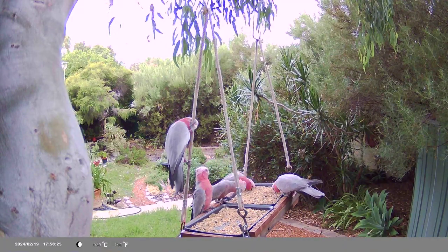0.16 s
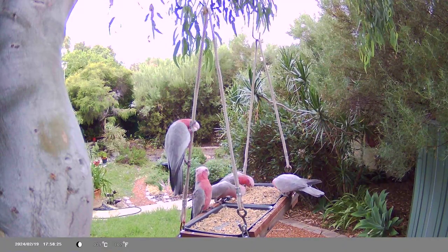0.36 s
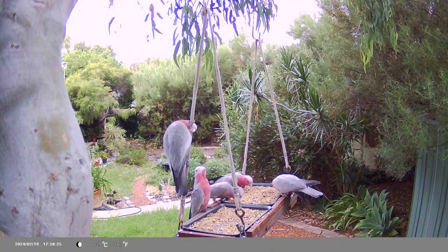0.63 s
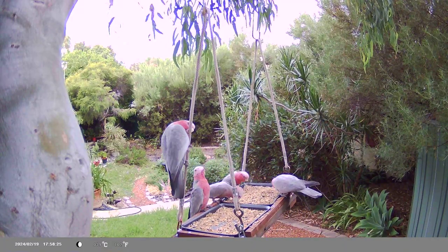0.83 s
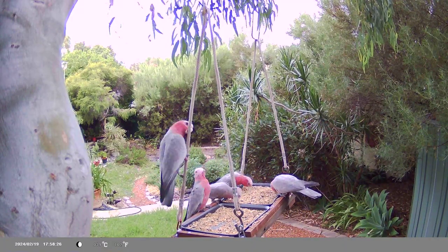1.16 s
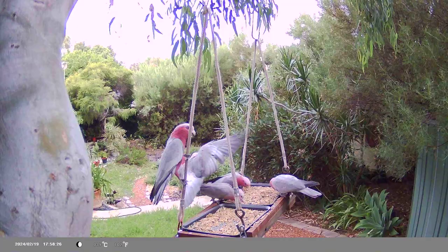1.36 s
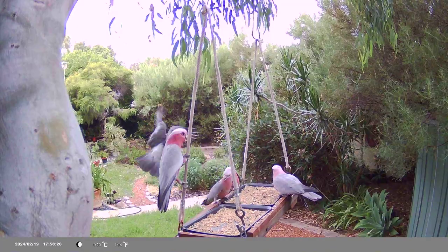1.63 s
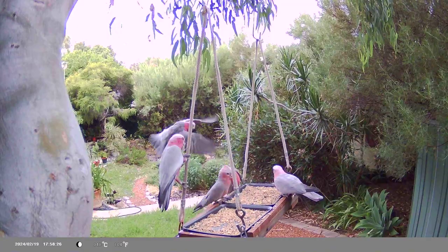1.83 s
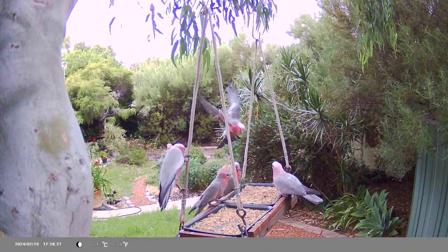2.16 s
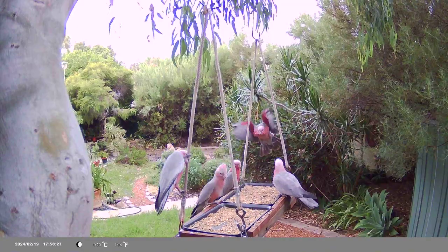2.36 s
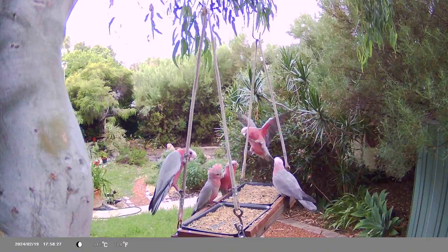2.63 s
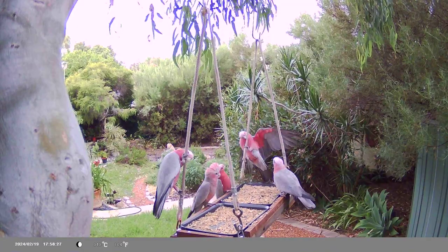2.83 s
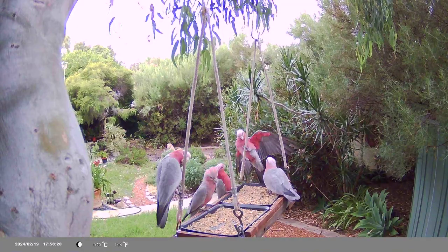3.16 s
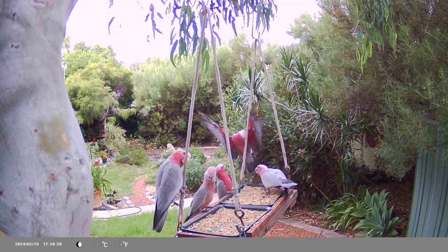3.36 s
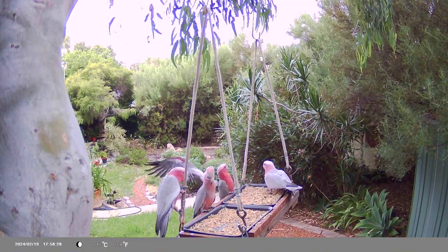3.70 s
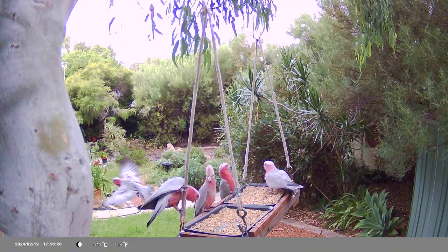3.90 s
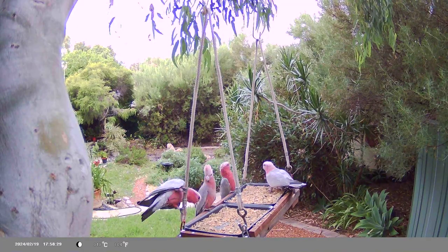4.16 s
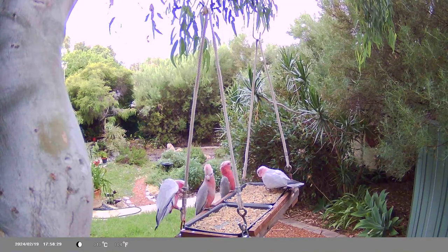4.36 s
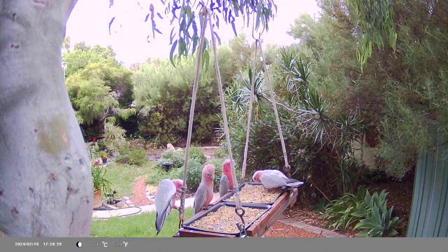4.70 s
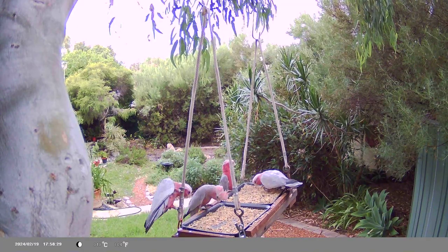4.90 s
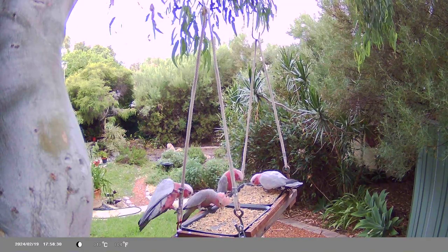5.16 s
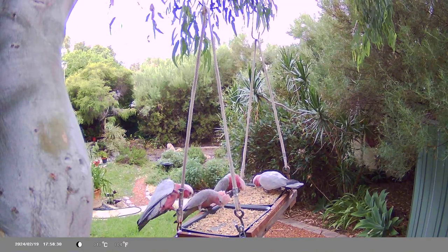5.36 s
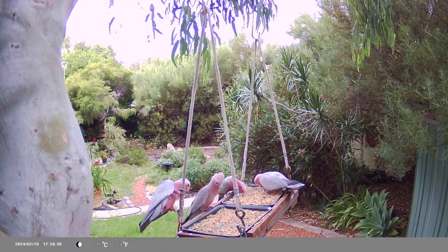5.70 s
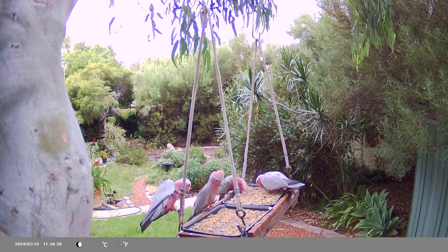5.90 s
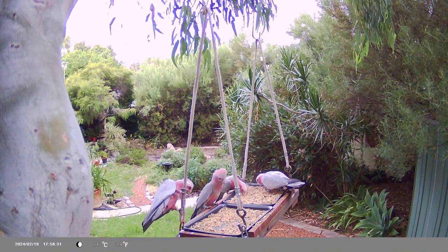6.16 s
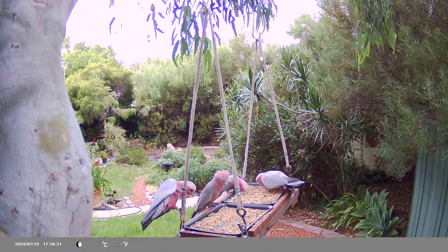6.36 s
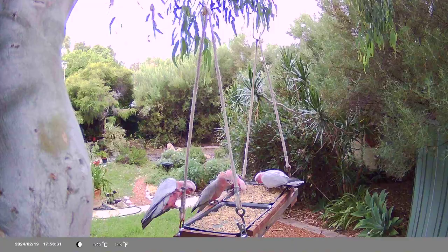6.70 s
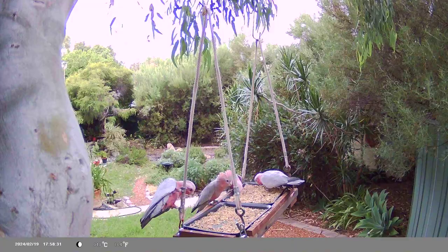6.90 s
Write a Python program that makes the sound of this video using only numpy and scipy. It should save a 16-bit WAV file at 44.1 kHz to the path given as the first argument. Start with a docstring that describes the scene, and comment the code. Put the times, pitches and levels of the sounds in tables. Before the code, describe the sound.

Pink-and-grey parrots squabble at a hanging wooden seed tray: two harsh screeches, fluttering wings, claw knocks, cracking husks and thin chirps over faint rumble.

```python
"""Galahs squabble on a hanging wooden seed tray in a garden: their voices are pulse trains shaped by a throat.
They beat their wings (swelling noise), knock the tray and crack seeds (short bursts through resonances).
Fences and shrubs return a faint echo, made of scattered, dying reflections.
A low distant rumble of filtered noise and a faint wavering hum lie underneath."""
import sys
import numpy as np
from scipy import signal
from scipy.fft import rfft, irfft, next_fast_len
from scipy.io import wavfile
from scipy.ndimage import uniform_filter1d

SR = 44100
rng = np.random.default_rng(int(sys.argv[2]) if len(sys.argv) > 2 else 0)


def dump(signal):
    """Clip the signal to [-1, 1] and save it as 16-bit WAV at the path in sys.argv[1]."""
    limited = np.clip(np.atleast_2d(signal).T, -1, 1)
    pcm = np.round(limited * 32767).astype(np.int16)
    wavfile.write(sys.argv[1], SR, pcm)


N = 310014   # length of the scene [samples]

# All levels of calls, knocks, snaps and cracks are relative: each kind gets its own gain in the mix.

# Distant rumble, tone colour: (frequency [Hz], relative level [dB])
RUMBLE_COLOUR = [(50, -16), (80, -13), (100, 1), (115, -2), (138, 2), (175, -3), (200, -4.5), (240, -13),
                 (400, -27), (1000, -58)]
RUMBLE_DB, HUM_DB = -47.5, -54.5   # rms levels
HUM_HZ = 99.5   # average pitch; it wavers

# Flurries of scuffling: (start [s], end [s], feather rustle [dB], low buffeting [dB])
FLURRIES = [(.04, .18, -62, -47), (1.5, 2.68, -59.8, -42.5), (3.42, 4.38, -59.3, -46.5),
            (4.62, 4.95, -63.5, -46.5)]
# Runs of wingbeats, a take-off, a landing and a departure:
# (first beat [s], last beat [s], low whoosh [dB], feather swish [dB], change of the swish [dB per s])
FLIGHTS = [(1.862, 2.745, -47, -55.5, 5), (3.215, 3.435, -54, -57, 17), (3.797, 4.497, -43, -50.5, -14)]
# Tone colour of rustling feathers: (frequency [Hz], relative level [dB per Hz])
FEATHER_COLOUR = [(600, -5.5), (1200, 2.5), (2200, 4), (3500, 0.5), (5000, -3.5), (7300, -8), (8500, -30),
                  (10000, -39.5)]
# Tone colour of air stirred by the wings: (frequency [Hz], relative level [dB per Hz])
AIR_COLOUR = [(150, -3), (280, 2.5), (420, -0.5), (580, 0), (750, -5), (1000, -7), (1600, -15), (3000, -30)]
# Tone colour of the whoosh of one wingbeat: (frequency [Hz], relative level [dB per Hz])
WHOOSH_COLOUR = [(110, -16), (220, 6), (330, 4), (480, -6.5), (800, -8.5), (1500, -26)]
# Tone colour of the very low buffeting: (frequency [Hz], relative level [dB per Hz])
BUFFET_COLOUR = [(12, -7), (25, 5), (38, 0), (49, 14), (62, -6), (85, -2), (160, -42)]
FLURRY_RISE_S, FLURRY_FALL_S = .21, .2
CALM_RUSTLE_DB, CALM_AIR_DB, CALM_BUFFET_DB = -68.3, -51.1, -49   # between flurries
AIR_FOLLOWS = .17   # share of the rustle's rise in dB that the air takes on
WINGBEATS_PER_S = 9   # roughly: each flight holds a whole number of beats
BEAT_SPREAD_DB = 1.1

# A long and a short harsh screech: (time [s], pitch [Hz], level [dB], roughness [0-1])
SCREECHES = [
    [(.034, 1180, -50, .02), (.041, 1180, -26.5, .05), (.053, 1240, -20.5, .8), (.106, 1160, -23, .85),
     (.118, 1385, -27, .55), (.148, 1248, -28, .12), (.188, 1200, -35, .18), (.208, 1365, -39, .18)],
    [(1.559, 1400, -50, .25), (1.570, 1530, -31, .08), (1.586, 1330, -17.5, .95), (1.596, 1295, -20, .75),
     (1.604, 1430, -22.5, .35), (1.617, 1470, -23.5, .1), (1.636, 1440, -32, .6), (1.642, 1430, -55, .3)],
]
# Throat and beak response for each screech: (frequency [Hz], level [dB])
SCREECH_THROATS = [
    [(250, -35), (480, -4), (850, -13), (1230, -5), (1550, -12.5), (2050, 0.5), (2500, 2.5), (2880, 1.5),
     (3100, -10), (3450, 1.5), (4100, -2), (4900, -16.5), (5600, -14), (7600, -22.5)],
    [(250, -44), (500, -6.5), (800, -17), (1350, -6.5), (1800, -8.5), (2450, 2), (2850, 2), (3200, -13),
     (4200, -8), (5200, -18), (6200, -25), (7400, -23)],
]
# Each single note below is (start [s], length [s], start pitch [Hz], middle pitch [Hz], end pitch [Hz],
# level [dB], swell over the note [dB], roughness [0-1]).
# A rasp that closes the long screech: columns as above
RASP = (.205, .056, 1000, 1070, 1070, -32.5, 7, .45)
# A second bird's short whine under the end of the long screech: columns as above
WHINE = (.202, .070, 1760, 1760, 1520, -40, -6, .35)
# Clear whistled chirps: columns as above
CHIRPS = [(.402, .046, 1990, 2020, 2260, -52, 15, .1), (.451, .022, 1850, 1740, 1580, -50, -8, .22),
          (4.716, .044, 2700, 2400, 1930, -38, -11, .2), (4.760, .046, 2200, 2040, 1800, -43, 4, .17),
          (5.052, .019, 2040, 2070, 2420, -37, 8, .08), (5.072, .015, 3600, 3990, 3650, -43, 0, .08),
          (5.087, .064, 2330, 1905, 1680, -28.6, -14, .085), (5.134, .012, 1850, 2400, 2850, -32, 0, .11),
          (5.150, .072, 2450, 2280, 1400, -33, -11, .1)]
# Thin squeals from further off: columns as above
SQUEALS = [(4.237, .022, 4120, 3740, 3650, -28, 12, .07), (4.611, .150, 2530, 2770, 2770, -36.8, -1, .34)]
# A low grunt that ends the first squeal: columns as above
GRUNT = (4.251, .037, 660, 655, 650, -39, -14, .22)
# Throat and beak response for chirps and the whine: (frequency [Hz], level [dB])
CHIRP_THROAT = [(1400, -7.5), (2200, -0.5), (3200, -8), (4100, 0), (5000, -16), (6200, -23), (7500, -16.5),
                (8500, -22)]
# Throat and beak response for squeals: (frequency [Hz], level [dB])
SQUEAL_THROAT = [(900, -23), (1900, -5), (2700, 0), (3700, 4.5), (4500, -6), (5500, 1), (6300, -22),
                 (7400, -7.5), (7900, -12), (8400, -13)]
# Throat and beak response for the grunt: (frequency [Hz], level [dB])
GRUNT_THROAT = [(300, -8), (650, -8), (1300, -3.5), (1950, -14), (2600, -11), (4200, -13), (6000, -20.5),
                (8000, -8.5)]
NOTE_RAMP_DB = 22   # depth of a note's attack and release
SWOOP_S = .0025   # how fast a falling chirp drops onto its pitch
ROUGH_DOUBLES, ROUGH_BLURS = .5, .5   # period doubling gained and tripling lost at full roughness

# Claws and beaks knock the tray: (time [s], peak level [dB], claw tick over wooden body [dB])
KNOCKS = [(0.557, -35.5, -2), (0.62, -41, -11), (1.042, -36.5, -12), (1.403, -33.5, 2), (1.522, -33, 2),
          (1.762, -36.5, -3), (2.696, -28.5, 6), (2.73, -35, 4), (2.823, -39, -10), (3.482, -28.5, -4),
          (3.585, -28.5, -1), (3.663, -32.5, 0), (4.471, -21, 6), (5.375, -42.5, -2)]
# Response of the wooden tray: (frequency [Hz], level [dB])
TRAY_BODY = [(200, -29.5), (600, -9.5), (1000, 5), (1700, 0.5), (2600, -10), (3500, -39), (6000, -41)]
# Response of a hard claw or beak, also used for splitting husks: (frequency [Hz], level [dB])
CLAW_TICK = [(1500, -34), (2700, 1), (3800, -0.5), (4800, 0.5), (6400, 0), (8000, -1.5)]
KNOCK_T60_S = .037   # time to die away by 60 dB

# The loudest seed husks crack: (time [s], peak level [dB], ring [Hz])
CRACKS = [(0.852, -42, 6740), (0.9113, -41, 3550), (1.4531, -31, 4520), (1.9016, -32, 6190),
          (2.372, -39, 5280), (2.5561, -40, 6160), (2.7776, -44, 4680), (2.9682, -43, 5500),
          (3.0031, -35, 4480), (3.0205, -40, 4930), (3.0929, -36, 4470), (3.1353, -45, 4350),
          (3.2286, -41, 5330), (3.2829, -42, 5400), (3.3174, -43, 5860), (3.3817, -45, 5630),
          (5.8581, -43, 3800), (5.9229, -48, 4320), (5.9913, -33, 5420), (6.4817, -42, 4710),
          (6.78, -41, 4220)]
# Bouts of quieter nibbling: (start [s], end [s], rate [cracks per s])
NIBBLING = [(.7, 1.3, 3), (5.8, 6.1, 10), (6.3, 6.7, 5)]
NIBBLE_DB, NIBBLE_SPREAD_DB = -46, 1.2
NIBBLE_LOW_HZ, NIBBLE_HIGH_HZ = 3200, 6500   # range of their rings

# Beaks snap shut: (time [s], peak level [dB])
SNAPS = [(0.832, -24.5), (6.243, -20)]
# Response of the snapping beak: (frequency [Hz], level [dB])
BEAK = [(300, -18), (900, 2), (1600, 1.5), (2400, -9.5), (3700, -8.5), (4900, -19), (6700, -8),
        (8300, -17.5)]

# Response of the microphone: (frequency [Hz], level [dB])
MICROPHONE = [(12, -8), (35, 0), (7400, 0), (8000, -6), (8500, -13), (9000, -24)]
CUTOFF_HZ = 8900   # top of the sound


def from_db(db):
    """Turn decibels into gain."""
    return 10 ** (np.asarray(db) / 20)


def rms_one(x):
    """Scale to an rms of 1."""
    return x / np.sqrt(np.mean(x ** 2) + 1e-20)


def curves(rows, t):
    """Read each column of a table at the times t."""
    s, *columns = np.transpose(rows)
    return [np.interp(t, s, column) for column in columns]


def add(out, start, sound):
    """Mix a sound in at its start time."""
    i = round(start * SR)
    out[i:i + len(sound)] += sound[:N - i]


def colour(x, spectrum):
    """Filter to the given (Hz, dB) response; minimum phase, so nothing sounds ahead of its cause."""
    size = 2 * next_fast_len(len(x) // 2 + 1024)
    hz, db = np.transpose(spectrum)
    grid_hz = np.fft.rfftfreq(size, 1 / SR)
    gain = from_db(np.interp(np.log(grid_hz + 1), np.log(hz), db))
    # folding the cepstrum forward in time gives the minimum phase
    cepstrum = irfft(np.log(gain))
    cepstrum[1:size // 2] *= 2
    cepstrum[size // 2 + 1:] = 0
    return irfft(rfft(x, size) * np.exp(rfft(cepstrum)))[:len(x)]


def drift(rate_hz, size):
    """Random wandering, mostly slower than the given rate, with a spread of 1."""
    hz = np.fft.rfftfreq(size, 1 / SR)
    slowed = rfft(rng.standard_normal(size)) / (1 + (hz / rate_hz) ** 2)
    return rms_one(irfft(slowed, size))


def noise(spectrum):
    """Coloured noise with an rms of 1."""
    return rms_one(colour(rng.standard_normal(N), spectrum))


def rumble_and_hum():
    """Steady low noise with a faint sine whose pitch wavers."""
    hum_hz = HUM_HZ * (1 + 0.02517 * drift(3.81, N))
    hum = np.sqrt(2) * np.sin(2 * np.pi * np.cumsum(hum_hz) / SR)
    return from_db(RUMBLE_DB) * noise(RUMBLE_COLOUR) + from_db(HUM_DB) * hum


def commotion():
    """Rustle and buffeting above their calm levels [dB]: each flurry rises, holds and dies down."""
    t = np.arange(N) / SR
    rises = []
    for start, end, rustle_db, buffet_db in FLURRIES:
        shape = np.interp(t, [start - FLURRY_RISE_S, start, end, end + FLURRY_FALL_S], [0, 1, 1, 0])
        rises.append(np.outer([rustle_db - CALM_RUSTLE_DB, buffet_db - CALM_BUFFET_DB], shape))
    return np.max(rises, axis=0)


def wingbeats():
    """Even beats through each flight, each with its own strength: (time [s], whoosh [dB], swish [dB])."""
    rows = []
    for first, last, whoosh_db, swish_db, db_per_s in FLIGHTS:
        count = round((last - first) * WINGBEATS_PER_S) + 1
        for s in np.linspace(first, last, count):
            effort_db = BEAT_SPREAD_DB * rng.standard_normal()
            rows.append((s, whoosh_db + effort_db, swish_db + db_per_s * (s - first) + effort_db))
    return rows


def wings(rise_s, fall_s, grain_db, flicks_per_s):
    """Feathers rustle and stir the air, more so in flurries; each wingbeat adds a whoosh and a swish."""
    busy_db, gust_db = commotion()
    whoosh, swish = np.zeros(N), np.zeros(N)
    t = np.arange(-SR // 8, SR // 8) / SR
    swell = np.exp(-(t / np.where(t < 0, rise_s, fall_s)) ** 2)
    for s, whoosh_db, swish_db in wingbeats():
        add(whoosh, s + t[0], from_db(whoosh_db) * swell)
        add(swish, s + t[0], from_db(swish_db) * swell)
    # quills flick past each other at random moments
    touches = rng.standard_normal(N) * (rng.random(N) < flicks_per_s / SR)
    flicks = rms_one(colour(touches, FEATHER_COLOUR))
    rustle_db = CALM_RUSTLE_DB + busy_db + grain_db * drift(200, N)
    feathers = from_db(rustle_db) * noise(FEATHER_COLOUR) + swish * flicks
    air = from_db(CALM_AIR_DB + AIR_FOLLOWS * busy_db) * noise(AIR_COLOUR) + whoosh * noise(WHOOSH_COLOUR)
    buffeting = from_db(CALM_BUFFET_DB + gust_db) * noise(BUFFET_COLOUR)
    return feathers + air + buffeting


def call(rows, throat, jitter, shimmer, hiss, chaos_hz, swing_db, flicker_db):
    """The syrinx pulses into the throat; pressed hard, it repeats every 2nd or 3rd cycle and turns chaotic."""
    t = np.arange(rows[0][0], rows[-1][0], 1 / SR)
    pitch, level_db, *shares = curves(rows, t)
    rough, doubling, tripling = np.clip(shares, 0, 1)
    shaky_pitch = pitch * (1 + jitter * rough * drift(chaos_hz, len(t)))
    phase = 2 * np.pi * np.cumsum(shaky_pitch) / SR
    pulses = np.zeros(len(t))
    # k counts sixths of the pitch: 6 is the fundamental, 3 its half, 2 and 4 its thirds
    for k in range(1, int(6 * CUTOFF_HZ / pitch.min())):
        weight = tripling * (k % 6 in (2, 4)) + doubling * (k % 6 == 3) + (k % 6 == 0)
        # a freely swinging membrane favours its fundamental
        weight = weight + (k == 6) * from_db(swing_db) * (1 - tripling)
        # tongue and beak keep shifting the partials
        weight = weight * from_db(flicker_db * np.sqrt(rough) * drift(35, len(t)))
        lag = .07 * k ** 2   # high partials leave later, which smears each pulse
        audible = k / 6 * pitch < SR / 3
        pulses += weight * np.cos(k / 6 * phase - lag) * audible
    pulses *= 1 + shimmer * rough * drift(chaos_hz, len(t))
    # air escapes once a cycle
    air = hiss * rough * rng.standard_normal(len(t)) * (1 + np.cos(phase))
    voice = colour(pulses + air, throat)
    # even out the loudness, so that the level column alone shapes it
    voice /= np.sqrt(np.abs(uniform_filter1d(voice ** 2, size=300)) + 1e-12)
    out = np.zeros(N)
    add(out, t[0], voice * from_db(level_db))
    return out


def screech(rows, break_s):
    """A rough voice doubles its period; after its break it also repeats every third cycle."""
    t = np.arange(rows[0][0], rows[-1][0], .001)
    pitch, level_db, rough = curves(rows, t)
    doubling = ROUGH_DOUBLES * rough
    tripling = (t > break_s) * (1 - ROUGH_BLURS * rough)
    return np.transpose([t, pitch, level_db, rough, doubling, tripling])


def note(row, attack_s, release_s, swoop=0, doubling=0, tripling=0, break_share=1):
    """One arc of pitch that swells or fades; it may swoop in from above, double its period, then triple it."""
    s, length, start_hz, middle_hz, end_hz, level_db, swell_db, rough = row
    u = np.linspace(0, 1, 100)   # share of the note that has passed
    pitch = np.polyval(np.polyfit([0, .5, 1], [start_hz, middle_hz, end_hz], 2), u)
    falling = end_hz < start_hz   # only falling notes swoop
    pitch = pitch * (1 + swoop * falling * np.exp(-u * length / SWOOP_S))
    opening = np.minimum(1, np.minimum(u * length / attack_s, (1 - u) * length / release_s))
    level = level_db + swell_db * (u - .5) + NOTE_RAMP_DB * (opening - 1)
    broken = u > break_share
    return np.transpose([s + u * length, pitch, level, np.full_like(u, rough),
                         doubling * rough * ~broken, tripling * rough * broken])


def screeches():
    """Harsh calls: rough, breathy pulses whose period doubles and triples; a rasp closes the long one."""
    long_screech = call(screech(SCREECHES[0], break_s=.112), SCREECH_THROATS[0], jitter=0.0915,
                        shimmer=0.56, hiss=3.8, chaos_hz=400, swing_db=9.5, flicker_db=4.0)
    rasp = call(note(RASP, attack_s=.005, release_s=.007, doubling=.5), SCREECH_THROATS[0], jitter=0.09,
                shimmer=0.56, hiss=3.8, chaos_hz=400, swing_db=11, flicker_db=4.0)
    short_screech = call(screech(SCREECHES[1], break_s=1.55), SCREECH_THROATS[1], jitter=0.093,
                         shimmer=0.34, hiss=3.3, chaos_hz=296, swing_db=8, flicker_db=3.5)
    return from_db(-4) * (long_screech + rasp) + from_db(-4.5) * short_screech


def whine():
    """A second bird's voice, with a very strong fundamental."""
    return call(note(WHINE, attack_s=.003, release_s=.012), CHIRP_THROAT, jitter=.1,
                shimmer=0.98, hiss=1.2, chaos_hz=200, swing_db=20, flicker_db=6)


def chirps():
    """Clear notes with a strong fundamental; the falling ones swoop in from above."""
    out = np.zeros(N)
    for row in CHIRPS:
        out += call(note(row, attack_s=.006, release_s=.004, swoop=.4), CHIRP_THROAT, jitter=.09,
                    shimmer=2.0, hiss=.8, chaos_hz=200, swing_db=10, flicker_db=6)
    return out


def garden(x, t60, delay, leaves):
    """Scattered reflections and a thin wash from the foliage, dying away after a short delay."""
    t = np.arange(SR // 2) / SR
    reflections = rng.random(len(t)) < 250 / SR   # about 250 per second
    echoes = rng.standard_normal(len(t)) * (reflections + leaves)
    response = echoes * from_db(-60 * t / t60) * (t > delay)
    return signal.fftconvolve(x, response / np.linalg.norm(response))[:N]


def contact(t60, scatter):
    """A sharp touch followed by a dying patter of tiny slips."""
    t = np.arange(SR // 10) / SR
    burst = scatter * rng.standard_normal(len(t)) * from_db(-60 * t / t60)
    burst[0] += 1
    return burst


def knocks():
    """Each blow sounds the damped wooden tray and the hard claw or beak."""
    out = np.zeros(N)
    for s, peak_db, tick_db in KNOCKS:
        blow = contact(KNOCK_T60_S, scatter=0.19)
        body = rms_one(colour(blow, TRAY_BODY))
        tick = rms_one(colour(blow, CLAW_TICK))
        sound = body + from_db(tick_db) * tick
        add(out, s, from_db(peak_db) * sound / np.abs(sound).max())
    return out


def nibbles():
    """Small cracks, unevenly spaced through each bout: (time [s], peak level [dB], ring [Hz])."""
    rows = []
    for start, end, per_s in NIBBLING:
        for slot in np.arange(start, end - .5 / per_s, 1 / per_s):
            s = slot + rng.random() / per_s
            peak_db = NIBBLE_DB + NIBBLE_SPREAD_DB * rng.standard_normal()
            rows.append((s, peak_db, rng.uniform(NIBBLE_LOW_HZ, NIBBLE_HIGH_HZ)))
    return rows


def seed_cracks(t60, width_hz, snap):
    """A husk splits with a snap and rings briefly in the beak."""
    out = np.zeros(N)
    for s, peak_db, hz in list(CRACKS) + nibbles():
        split = colour(contact(t60, scatter=.25), CLAW_TICK)
        ring = signal.lfilter(*signal.iirpeak(hz, hz / width_hz, fs=SR), split)
        sound = ring + snap * split
        add(out, s, from_db(peak_db) * sound / np.abs(sound).max())
    return out


def beak_snaps():
    """One dry, clean click each: a single impulse coloured by the beak."""
    out = np.zeros(N)
    click = colour(signal.unit_impulse(SR // 50), BEAK)
    for s, peak_db in SNAPS:
        add(out, s, from_db(peak_db) * click / np.abs(click).max())
    return out


def far_squeals():
    """Thin voices that break into period tripling; being further off, they carry much more garden echo."""
    voice = np.zeros(N)
    for row in SQUEALS:
        rows = note(row, attack_s=.006, release_s=.005, doubling=.7, tripling=2.0, break_share=.44)
        voice += call(rows, SQUEAL_THROAT, jitter=0.054,
                      shimmer=1.0, hiss=.4, chaos_hz=200, swing_db=-5, flicker_db=8)
    echo = garden(voice, t60=0.31, delay=0.013, leaves=0.057)
    return from_db(-3.5) * voice + from_db(-10.5) * echo


def grunt():
    """A low, breathy voice with slow pulses."""
    return call(note(GRUNT, attack_s=.005, release_s=.003), GRUNT_THROAT, jitter=0.073,
                shimmer=.6, hiss=2.9, chaos_hz=300, swing_db=5.5, flicker_db=-1)


def scene():
    """Birds and tray in the garden, over the distant rumble and a faint hum."""
    calls = screeches() + from_db(-3.5) * whine() + from_db(-3.0) * chirps() + from_db(-0.5) * grunt()
    cracks = seed_cracks(t60=.026, width_hz=760, snap=0.42)
    contacts = from_db(2.5) * knocks() + from_db(3.2) * cracks + from_db(2) * beak_snaps()
    near = calls + contacts
    echo = from_db(-19) * garden(near, t60=0.3, delay=0.014, leaves=0.11)
    flapping = wings(rise_s=0.015, fall_s=0.023, grain_db=3.26, flicks_per_s=1500)
    return (near + echo + far_squeals() + flapping + rumble_and_hum())[None]


def record(dry):
    """A small outdoor microphone with a dull top, cut off steeply above its limit."""
    dull = colour(dry[0], MICROPHONE)
    lowpass = signal.ellip(10, .2, 70, CUTOFF_HZ, fs=SR, output="sos")
    return signal.sosfilt(lowpass, dull)[None]


dry = scene()
out = record(dry)
dump(out)
```